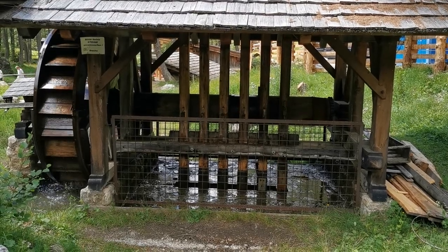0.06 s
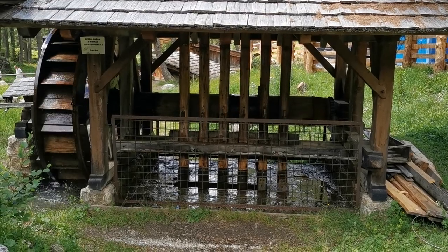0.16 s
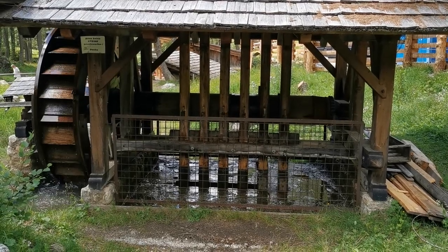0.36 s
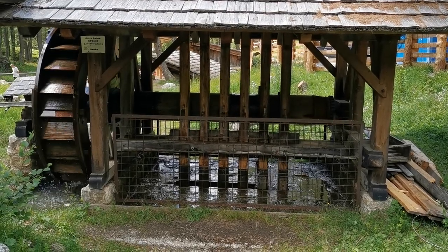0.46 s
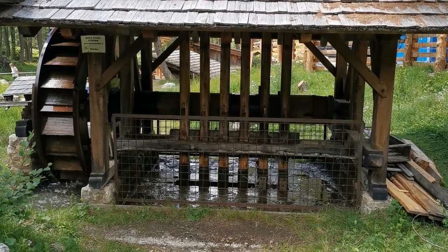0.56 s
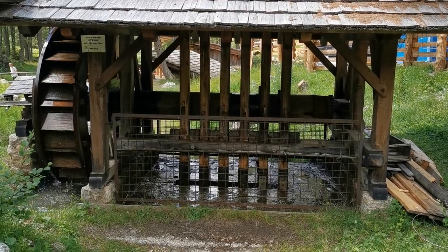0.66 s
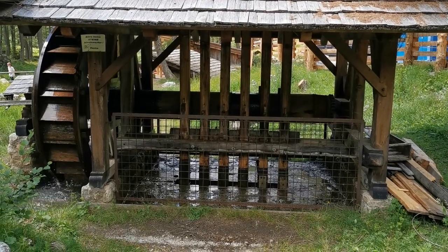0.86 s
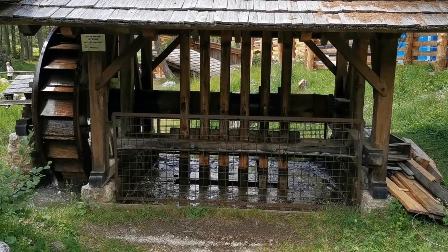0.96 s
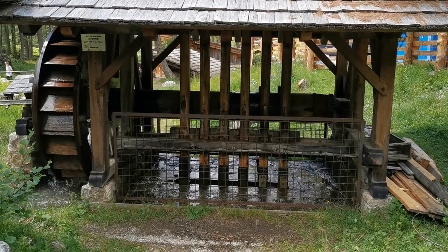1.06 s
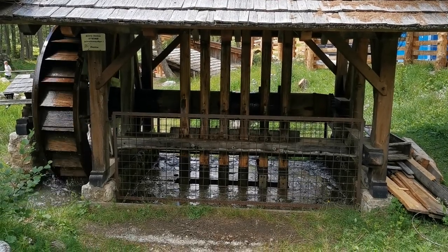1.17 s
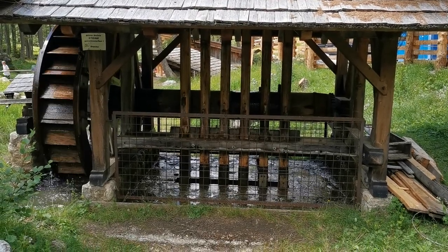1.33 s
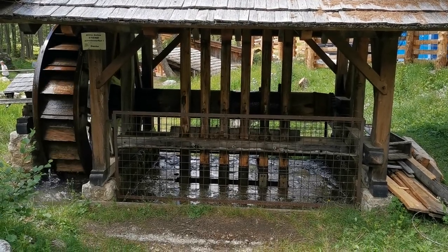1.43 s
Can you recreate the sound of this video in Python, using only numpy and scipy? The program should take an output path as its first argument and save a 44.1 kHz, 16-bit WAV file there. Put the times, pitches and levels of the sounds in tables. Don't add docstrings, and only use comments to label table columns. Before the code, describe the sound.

Heavy wooden stamps with loose iron shoes land on crushed stone, thudding first, then clanking sharply and chattering briefly. Stones crack between blows and quiet water bubbles behind, heard outdoors in stereo with a short roof echo.

```python
import sys
import numpy as np
from scipy import signal
from scipy.fft import rfft, irfft
from scipy.io import wavfile
from scipy.ndimage import uniform_filter1d

SR = 44100
rng = np.random.default_rng(int(sys.argv[2]) if len(sys.argv) > 2 else 0)


def generate_wav(signal):
    frames = np.transpose(np.atleast_2d(signal))
    scaled = np.clip(frames, -1, 1) * 32767
    pcm = np.round(scaled).astype(np.int16)
    wavfile.write(sys.argv[1], SR, pcm)


def elevation(decibels):
    levels = np.asarray(decibels, float)
    return 10 ** (levels / 20)


N = 66150


def curve(table, hz):
    rows = np.array(table)
    return np.interp(np.log(hz + 1), np.log(rows[:, 0]), rows[:, 1])


def colour(x, db_of):
    size = 4096
    cepstrum = irfft(db_of(np.fft.rfftfreq(size, 1 / SR)) * np.log(10) / 20)
    cepstrum[1:size // 2] *= 2
    cepstrum[size // 2 + 1:] = 0
    response = irfft(np.exp(rfft(cepstrum)))
    return signal.fftconvolve(x, response[None], axes=-1)[:, :N]


def unit(x):
    return x / np.sqrt(np.mean(x ** 2))


def shape(start, rise, t60):
    t = np.maximum(np.arange(N) / SR - start, 0)
    return (1 - np.exp(-t / max(rise, 1e-4))) * elevation(-60 * t / t60)


def ring(x, hz, t60):
    radius = elevation(-60 / (max(t60, 0.005) * SR))
    angle = 2 * np.pi * hz / SR
    return signal.lfilter([0, np.sin(angle)], [1, -2 * radius * np.cos(angle), radius * radius], x)


def clicks(rate, spread_db):
    chance, sign, size = rng.random((3, 2, N))
    level = elevation(spread_db * np.minimum(-np.log(1 - size), 4))
    return unit((chance < rate / SR) * np.sign(sign - 0.5) * level)


def walk(rate):
    k = int(SR / rate)
    steps = np.repeat(rng.standard_normal(N // k + 1), k)
    return 1.3 * uniform_filter1d(uniform_filter1d(steps, k), k)[:N]


# frequency in Hz, level in dB per Hz.
WATER_SPECTRUM = [(22, -11), (110, -1.5), (166, -15), (281, -5), (415, -16.5), (1500, -25.5), (4500, -28),
                  (16000, -42)]


def water():
    rush, swell, f = 0, walk(3.6), np.fft.rfftfreq(N, 1 / SR)
    for hz in 25 * 2 ** np.arange(0, 9.6, 0.5):
        window = np.exp(-(np.log2((f + 1) / hz) / 0.35) ** 2)
        band = irfft(rfft(rng.standard_normal((2, N))) * window, N)
        rush = rush + band * elevation(0.6 * swell + 1.6 * walk(14))
    bubbles_per_s, bubble_db, water_db = 890, -12.5, -45
    t = np.arange(800) / SR
    pops = np.zeros((2, N + 800))
    for when, pitch, size, side in rng.random((2000, 4))[:int(bubbles_per_s * N / SR)]:
        hz = 500 * 2 ** (3.2 * pitch)
        level = elevation(-2.5 * np.log(1 - size)) * np.sqrt(hz / 300)
        chirp = np.sin(2 * np.pi * hz * t * (1 + 0.0179 * hz * t))
        start = int(when * N)
        pops[int(2 * side), start:start + len(t)] += level * chirp * np.exp(-t * hz / 10.5)
    mix = unit(rush) + elevation(bubble_db) * unit(pops[:, :N])
    return elevation(water_db) * unit(colour(mix, lambda f: curve(WATER_SPECTRUM, f)))


# frequency in Hz, level in dB per Hz.
GRIT_SPECTRUM = [(180, -34), (400, -12), (900, -6), (2000, -9), (4500, -14.5), (8500, -18.5),
                 (12500, -25.5), (16000, -27)]


def grit(tilt_db=0.):
    grains = rng.standard_normal((2, N)) + 1.02 * clicks(1500, 3.6)
    return unit(colour(grains, lambda f: curve(GRIT_SPECTRUM, f) + tilt_db * np.log2((f + 50) / 2500)))


# start in seconds, level in dB, rise in seconds, t60 in seconds,
# tilt in dB per octave.
SCRAPES = [(0.228, -25.5, 0.00084, 0.15, 2), (0.244, -33.5, 0.0031, 1, 0.5),
           (0.441, -34.5, 0.045, 0.65, -3), (0.628, -37, 0.032, 0.83, 0.5), (0.2283, -32, .0005, 0.028, -9),
           (0.799, -34.5, 0.022, 0.88, 2), (0.8907, -37.5, 0.0009, 0.068, 6),
           (0.922, -33, 0.0005, 0.17, 3.5), (0.956, -37, 0.0011, 0.14, 2), (.56, -38.5, 0.03, 0.35, 0),
           (.716, -33.5, 0.0033, 0.42, -3.5), (1.16, -32.5, 0.0064, 0.18, -7),
           (1.202, -38, 0.0038, 0.1, -2), (.17, -47, 0.013, 0.43, 2.5), (.648, -41.5, .001, 0.086, 3),
           (1.336, -46.5, .003, 0.17, 6), (1.37, -47.5, 0.0028, 1, 1)]


def scrapes():
    rough = elevation(1.2 * walk(60))
    total = sum(elevation(db) * shape(s, rise, t60) * grit(tilt) for s, db, rise, t60, tilt in SCRAPES)
    return elevation(-4) * rough * total


# start in seconds, level in dB, frequency in Hz,
# length in cycles.
TICKS = [(.7175, -28, 2089, 200), (.734, -27, 2089, 90), (.750, -31, 2089, 71), (.725, -39, 3662, 410),
         (1.2025, -24.5, 2085, 31), (1.2105, -33, 3662, 160), (1.213, -34, 2765, 130),
         (.293, -25.5, 1966, 126), (.426, -34, 1966, 112), (.413, -39.5, 3662, 180),
         (.7165, -16.5, 2270, 16), (1.1452, -16.5, 2450, 12), (.2905, -18.5, 2200, 11),
         (0.27, -21, 3060, 23), (0.8607, -31, 1000, 4), (0.833, -27, 3200, 4.7), (.8463, -31, 5500, 3.7),
         (0.8937, -21, 3600, 3), (.905, -31, 3000, 6.7), (.9222, -15, 9400, 4.5), (.9224, -29, 6200, 3),
         (1.1, -30, 3000, 3), (1, -22, 6300, 7.2), (.9355, -21, 9800, 6.5), (.9345, -36, 5400, 5),
         (0.942, -32, 3200, 3.6), (.9565, -36, 9500, 4), (0.89, -29, 2900, 7.7), (.9665, -22, 6900, 6.6),
         (.989, -37, 11000, 6), (1.371, -31, 5100, 5.6)]


def ticks():
    t = np.arange(N) / SR
    mono = np.zeros(N)
    for s, db, hz, cycles in TICKS:
        mono += elevation(db) * shape(s, 0.00019, 3 * cycles / hz) * np.sin(2 * np.pi * hz * (t - s))
    return mono * np.array([[1], [0.5]])


# start in seconds, level in dB, rise in seconds.
THUDS = [
    (.2290, -16, 0.0036),
    (0.2893, -17.5, 0.002),
    (0.4945, -14.5, 0.0035),
    (0.567, -20, 0.0046),
    (.590, -19.5, 0.0032),
]
# frequency in Hz, level in dB, t60 in seconds.
STAMP_MODES = [(188.6, 4.5, 0.06), (119, -38, 0.13), (267, -12.5, 0.14), (555, -5.5, 0.072),
               (705, 0, 0.031), (775, -9.5, 0.077), (1220, -7, 0.04)]
TROUGH_MODES = [(91.3, -8, 0.25), (137, -4, 0.14), (187, -42, 0.3), (259.7, -13.5, 0.48),
                (539, -17.5, 0.16), (652, -1, 0.027), (31.7, -15.5, 0.42)]
POST_MODES = [(278.8, -1, 0.2), (257, -10.5, 0.094), (301, -8.5, 0.11), (556, -5.5, 0.1),
              (484, -9.5, 0.083), (609, -6.5, 0.053), (1307, -5.5, 0.021), (199, -15, 0.33)]
FRAME_MODES = [(78.5, -3.5, 0.16), (57, -24, 0.16), (158, -11.5, 0.13), (264, -3.5, 0.067)]
# start in seconds, level in dB, t60 in seconds.
SHUDDERS = [(0.234, -27.5, 0.35), (0.303, -29.5, 0.36), (0.377, -33.5, 0.78), (0.499, -35, 0.43),
            (1.381, -42.5, 0.38), (.0, -41, 0.24)]
# frequency in Hz, level in dB per Hz.
SHUDDER_SPECTRUM = [(15, -27), (25, -9), (156, -3.5), (196, -1), (484, -10), (608, -4.5), (827, -18),
                    (1200, -7), (1560, -44), (2640, -120)]


def timber():
    out, t = np.zeros((2, N)), np.arange(N) / SR
    parts = [STAMP_MODES, TROUGH_MODES, POST_MODES, FRAME_MODES, FRAME_MODES]
    for (s, db, rise), modes in zip(THUDS, parts):
        for hz, mode_db, t60 in modes:
            out[0] -= elevation(db + mode_db) * shape(s, rise, t60) * np.sin(2 * np.pi * hz * (t - s))
    noise = rng.standard_normal((2, N))
    shake = unit(colour(noise, lambda f: curve(SHUDDER_SPECTRUM, f) - 12 * np.log2(1 + f / 1200)))
    return out + shake * sum(elevation(db) * shape(s, 0.0081, t60) for s, db, t60 in SHUDDERS)


# frequency in Hz, t60 in seconds, level in dB on
IRON_MODES = [(770, 0.077, -34, -23, -23, -27), (1191.7, 0.07, -21, -15, -13.5, -14.5),
              (1744, 0.15, -25.5, -19, -22, -20), (1964, 0.11, -14.5, -15, -23, -32),
              (2089, 0.11, -17, -11.5, -14.5, -22), (2325, 0.009, -13, -28, -23, -38),
              (2400, 0.027, -38, -29, -22, -38), (2780, 0.25, -34, -54, -42, -27),
              (3045, 0.049, -20, -14.5, -21, -30), (3220, 0.04, -16.5, -12.5, -28.5, -38),
              (3660, 0.23, -26.5, -21.5, -32, -24.5),
              (613, 0.092, -39, -24, -32, -52), (969, 0.096, -40, -26, -29, -30),
               (1460, 0.027, -42, -30, -39, -30), (2290, 0.065, -25, -31, -30, -35),
               (2480, 0.075, -38, -34, -27, -39), (2875, 0.047, -31, -23, -19, -19.5),
               (10700, 0.16, -42, -34, -38, -39), (11750, .1, -47, -38, -41, -39),
               (12100, .1, -47, -42.5, -43, -43)]
BOLT_HZ = [4030, 4280, 5100, 5258, 5740, 6055, 6920, 7473, 8030, 8170, 8520, 8730, 9115, 9900]
# t60 in seconds, level in dB on blow 0, 1, 2, 3.
BOLT_RINGS = [(0.1, -32, -30, -26, -24), (0.079, -36, -26, -31, -38), (0.075, -39, -30, -29, -36),
              (0.11, -30.5, -23, -26, -25), (0.17, -34, -27, -33.5, -38), (0.25, -42, -28, -30.5, -30),
              (0.17, -40, -34, -31, -32), (0.14, -44, -19.5, -40, -40), (0.13, -33, -25, -29, -30),
              (0.12, -36, -31, -26.5, -28), (0.065, -34, -27, -36, -32), (0.37, -36.5, -23.5, -40, -34),
              (0.11, -43, -34, -30, -33), (0.11, -36, -24, -37, -37)]
# start in seconds, level in dB, chatter t60 in seconds.
CLANKS = [
    [(.2893, -8.5, 0.055), (.297, -13, 0.092), (.315, -17.5, 0.45)],
    [(.3612, -12.5, 0.032)],
    [(.4089, -17, 0.072), (.428, -25, 0.12)],
    [(.7155, -11, 0.046), (.734, -15, 0.066), (.750, -19.5, 0.1), (.785, -23.5, 0.33)],
    [(1.1442, -11, 0.037), (1.1525, -17, 0.058), (1.166, -19, 0.066), (1.171, -21, 0.12),
     (1.179, -29, 0.06), (1.186, -21.5, .06)],
    [(1.2023, -13, 0.03), (1.2105, -19, 0.055), (1.215, -23.5, 0.068), (1.222, -32, .1),
     (1.232, -38, 0.067)],
]
BLOW_OF_GROUP = [0, 0, 0, 1, 2, 3]
SEATED_S = [.336, .368, .455, .779, 1.195, 1.25]


def iron():
    rise_s, strike_t60_s, seated_t60_s = 0.0017, 0.029, 0.098
    strike_db, tap_db, rasp_db, crack_db = -15, -5.5, -16.5, 1
    out, t = np.zeros((2, N)), np.arange(N) / SR
    knock = unit(ring(rng.standard_normal((2, N)), hz=2350, t60=0.006))
    modes = IRON_MODES + [(hz, *row) for hz, row in zip(BOLT_HZ, BOLT_RINGS)]
    for k, rows in enumerate(CLANKS):
        chatter = sum(elevation(db) * shape(s, rise_s, t60) for s, db, t60 in rows)
        strike = sum(elevation(db + strike_db) * shape(s, rise_s, strike_t60_s) for s, db, _ in rows)
        drive = chatter * clicks(rate=1500, spread_db=-1.5) * elevation(-24)
        for s, db, _ in rows:
            drive[:, int(s * SR) + 1] += elevation(db + tap_db) * np.array([1, 0.6])
        start = int(rows[0][0] * SR)
        span = slice(start, start + SR // 2)
        rung = 0
        for j, mode in enumerate(modes):
            level = (-1) ** j * elevation(mode[2 + BLOW_OF_GROUP[k]])
            rung = rung + level * ring(drive[:, span], mode[0], mode[1])
        out[:, span] += rung * elevation(-60 * np.maximum(t[span] - SEATED_S[k], 0) / seated_t60_s)
        out += chatter * elevation(rasp_db) * grit() + strike * elevation(crack_db) * knock
    return out


# frequency in Hz, width in Hz, left level in dB, right level in dB.
PORTS = [(719, 108, 3.5, 5), (2487, 887, -4, 13), (5550, 610, -4.5, 8), (7710, 384, -3.5, -14),
         (60, 520, 1, -2.5), (13680, 1630, -11.5, -12.5)]


def ports(x, apart):
    treble = signal.lfilter(*signal.butter(1, 1690, "high", fs=SR), x[1])
    other = apart * treble + 0.13 * x[1]

    def gain(column):
        return lambda f: sum(p[column] / (1 + ((f - p[0]) / p[1]) ** 2) for p in PORTS)

    left = colour((x[0] + other)[None], gain(2))
    right = colour((x[0] - other)[None], gain(3))
    return np.vstack([left, right])


def roof(blows):
    roof_t60_s, roof_db = 0.16, -10
    tail = rng.standard_normal((2, N // 4)) * shape(0.004, 0.011, roof_t60_s)[:N // 4]
    tail = signal.lfilter(*signal.butter(1, 400, "high", fs=SR), tail)
    tail = tail / np.sqrt(np.sum(tail ** 2) / 2)
    return elevation(roof_db) * signal.fftconvolve(blows[:1], tail, axes=-1)[:, :N]


def scene():
    blows = iron() + scrapes() + ticks() + timber()
    return ports(blows + roof(blows), apart=0.68) + ports(water(), apart=1)


def top_cut(x):
    return signal.sosfilt(signal.butter(12, 16870, fs=SR, output="sos"), x)


def record(dry):
    low_pass = signal.ellip(8, 0.5, 60, 15750, fs=SR, output="sos")
    mix = signal.sosfilt(low_pass, dry)
    return top_cut(mix)


dry = scene()
out = record(dry)
generate_wav(out)
```